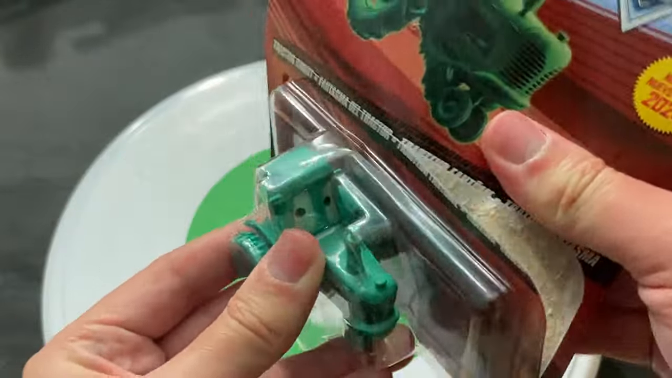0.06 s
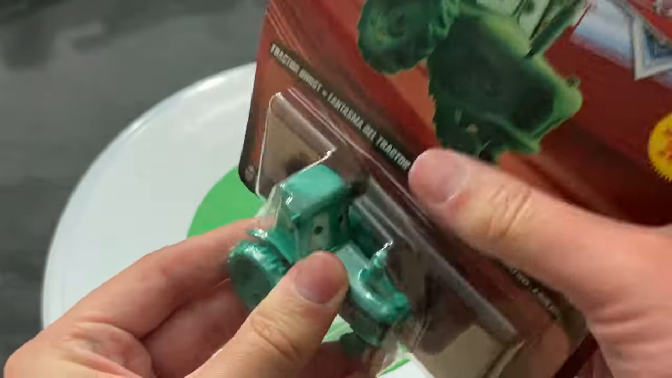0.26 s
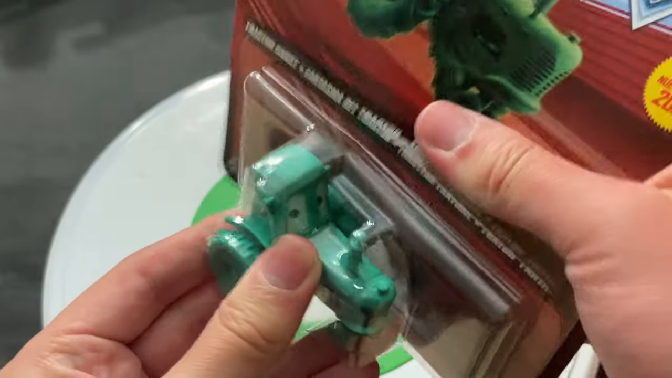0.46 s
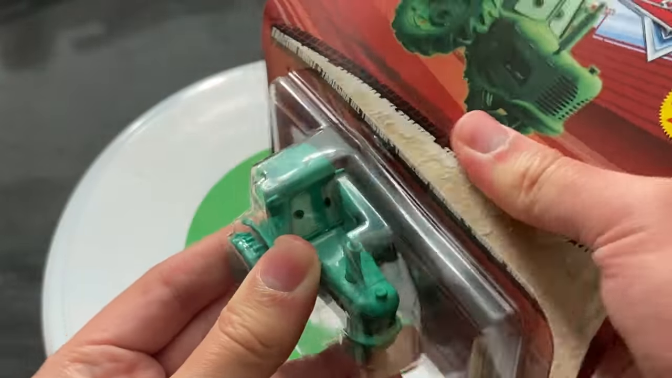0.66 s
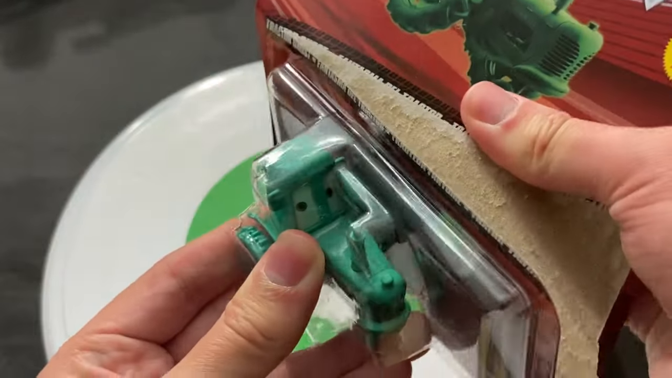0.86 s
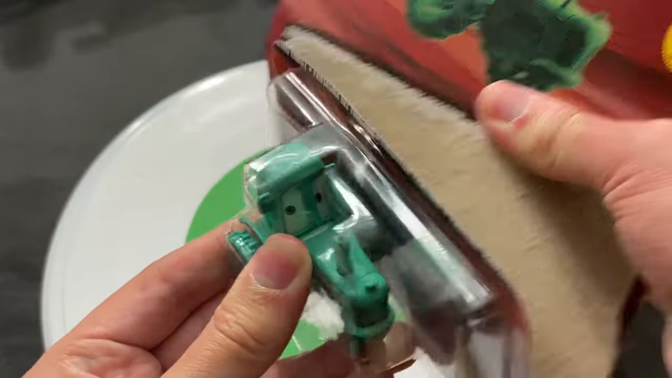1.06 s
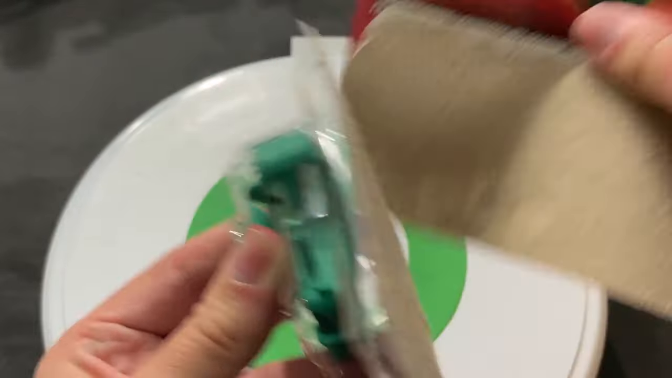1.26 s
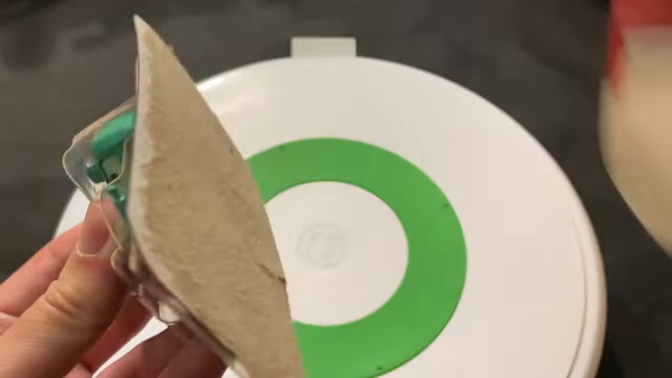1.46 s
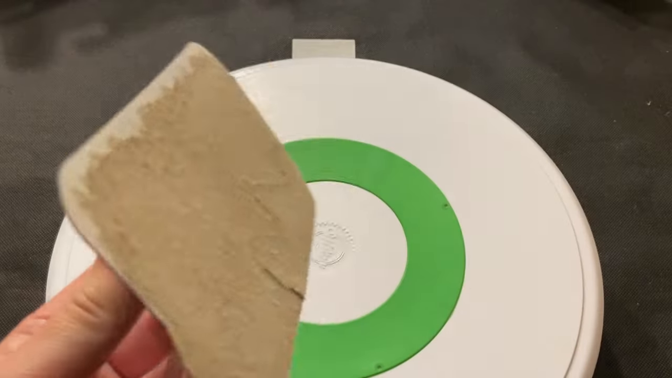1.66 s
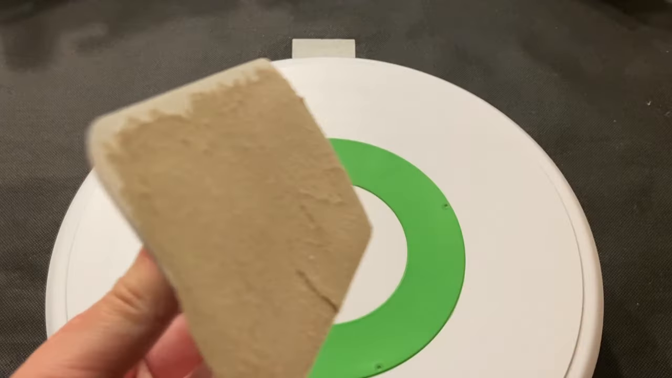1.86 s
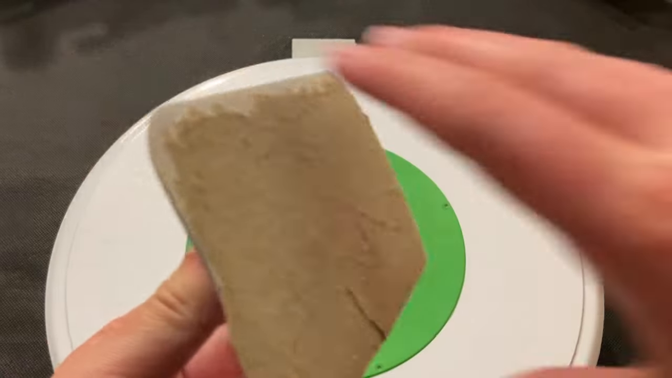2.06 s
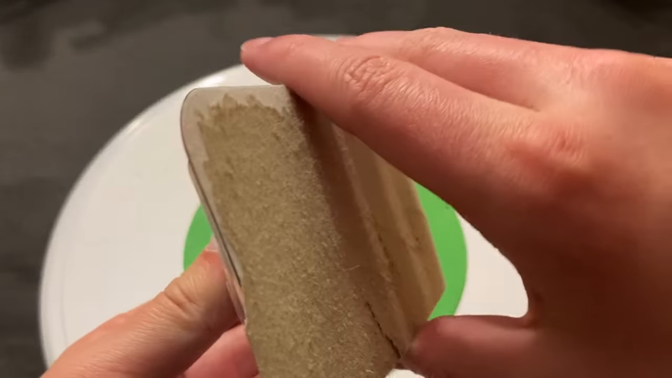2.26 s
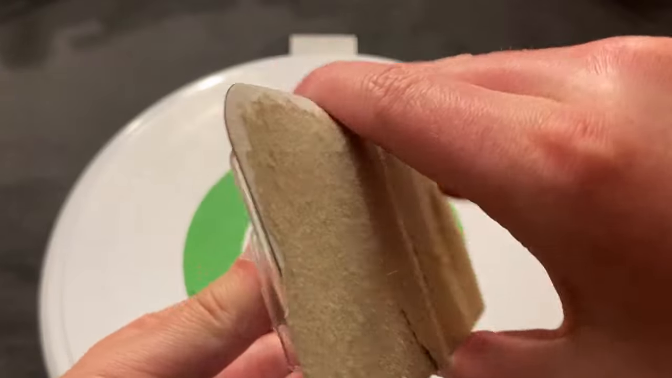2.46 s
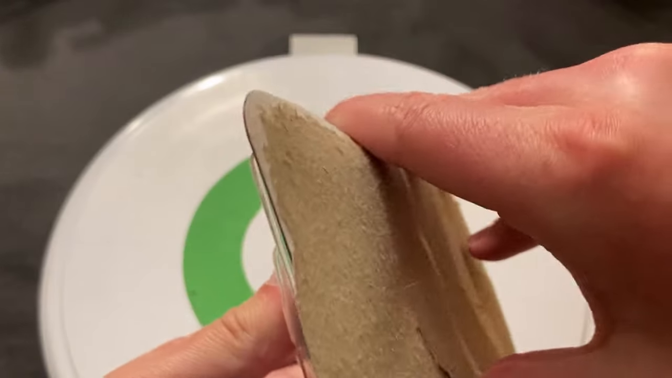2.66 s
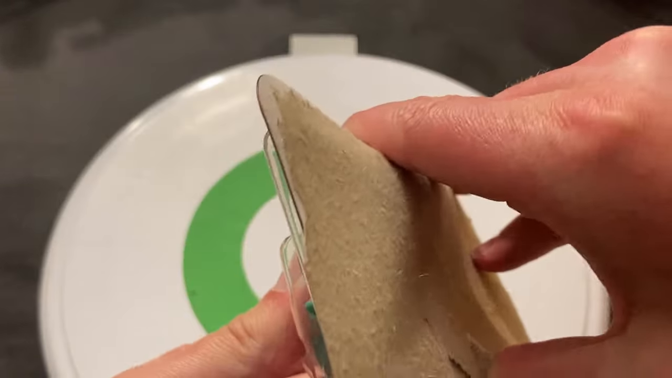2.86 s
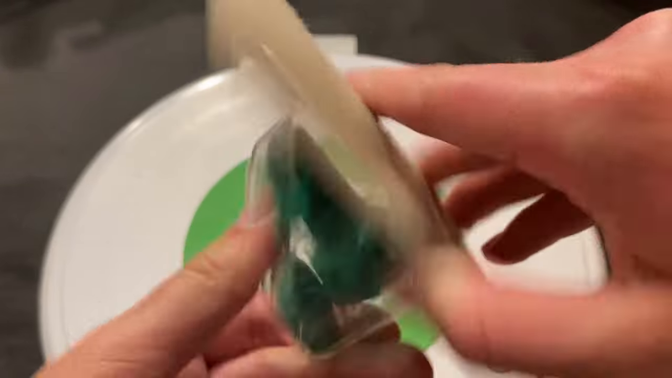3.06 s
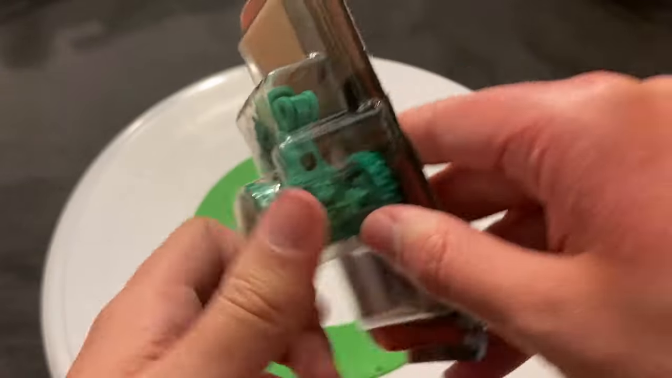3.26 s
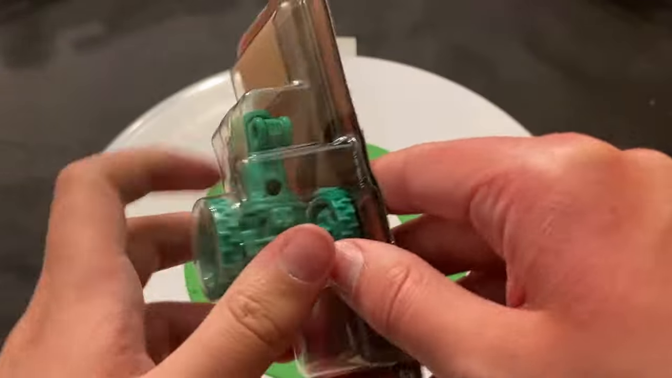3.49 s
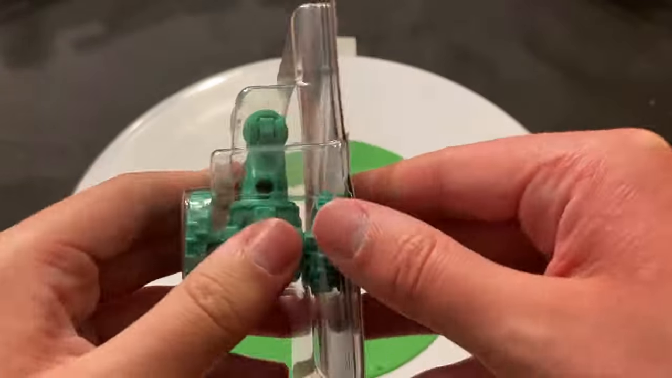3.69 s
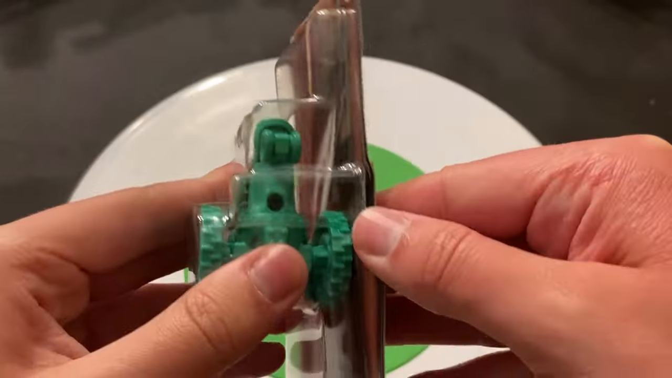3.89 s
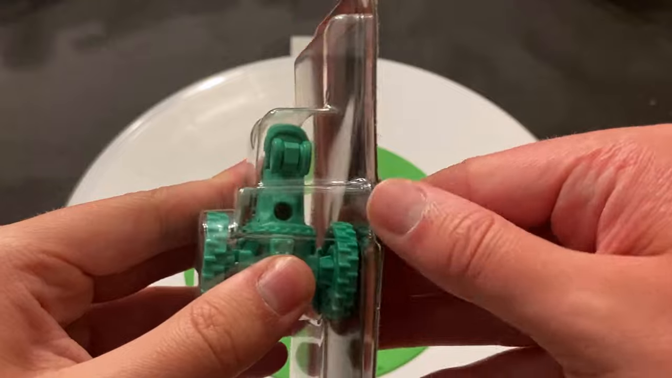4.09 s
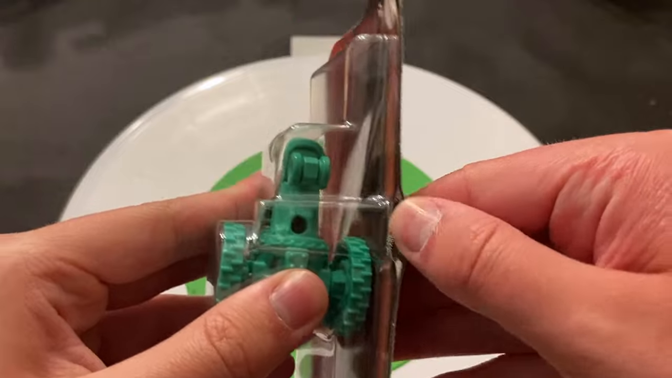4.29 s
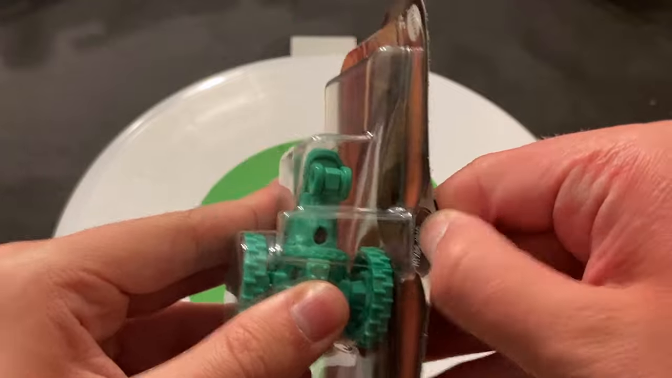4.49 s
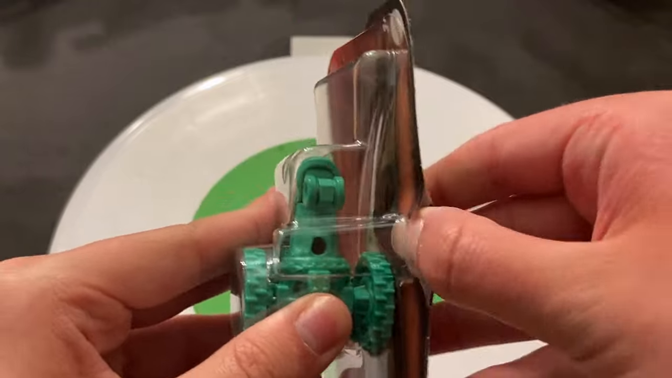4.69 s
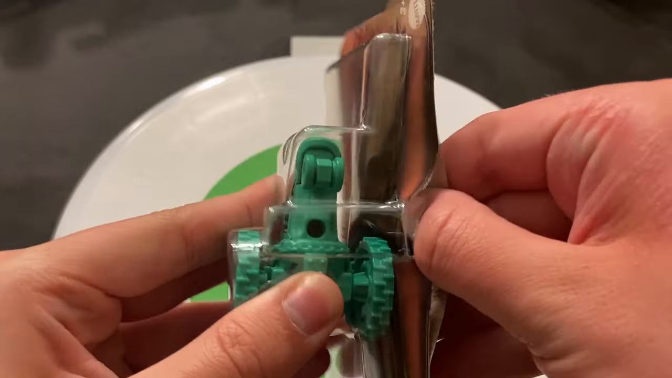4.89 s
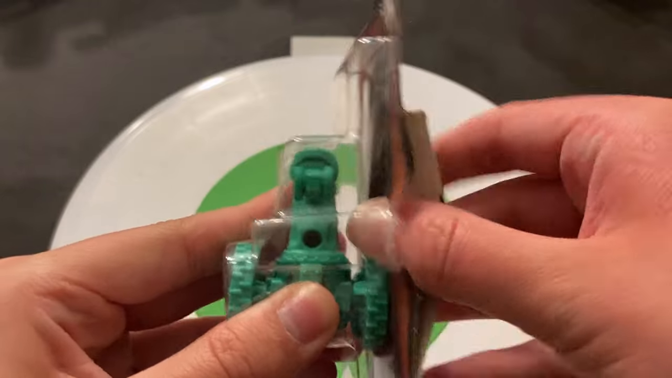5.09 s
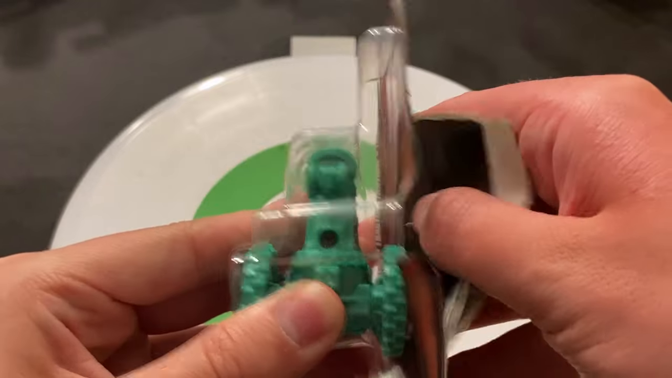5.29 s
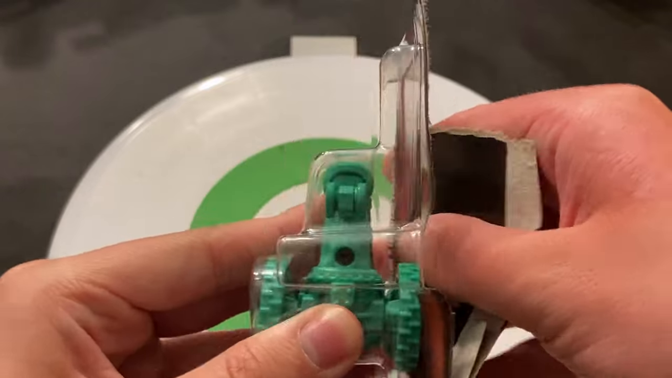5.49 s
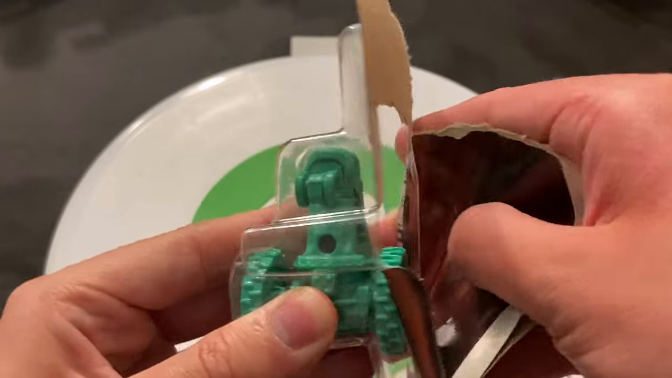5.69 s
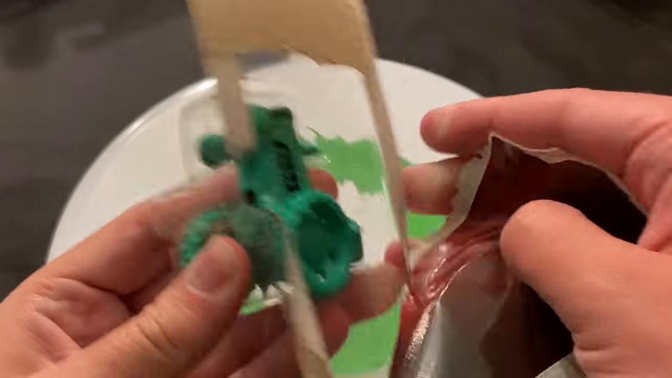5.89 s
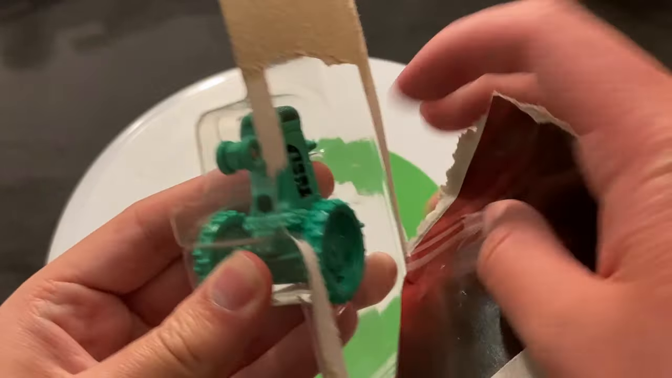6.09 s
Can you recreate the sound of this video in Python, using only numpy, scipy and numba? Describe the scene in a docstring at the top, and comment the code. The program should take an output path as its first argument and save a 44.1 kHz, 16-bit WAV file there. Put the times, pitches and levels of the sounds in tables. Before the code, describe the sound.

Close handling of a blister-packed toy: card fibres tear in jerky bursts, plastic snaps, loose card drops, quiet crinkles, then a final run of tears.

```python
"""Hands tear a cardboard backing off a plastic blister close to a phone in a small quiet room.
Over faint room tone, breaking paper fibres hiss from the start and drive the boxy ring of the pack.
Glue and plastic let go in ringing cracks, and jolts send falling bending waves along the card.
Near 1.9 s the loose card is dropped and bounces; lighter handling follows, then from about 4.9 s
a last run of hard cracks and tears."""
import sys
import numpy as np
from scipy import signal
from scipy.fft import rfft, irfft, next_fast_len
from scipy.io import wavfile
from scipy.ndimage import uniform_filter1d
from numba import njit

SR = 44100
rng = np.random.default_rng(int(sys.argv[2]) if len(sys.argv) > 2 else 0)


def gain_from_decibels(decibels):
    """Convert decibel values to linear amplitude factors."""
    exponent = np.asarray(decibels, float) / 20
    return 10 ** exponent


def digitize_waveform(pressure):
    """Quantize a signal to 16-bit integers and store it at the path in sys.argv[1].

    Rows of a 2-D input are taken as channels; values are limited to [-1, 1].
    """
    field = np.atleast_2d(pressure).T
    bounded = np.clip(field, -1, 1)
    quanta = np.round(bounded * 32767).astype(np.int16)
    wavfile.write(sys.argv[1], SR, quanta)


N = 271065
CARD_OFF_S = 2.05  # until then flaps and jolts run through the large piece of card


def unit(x):
    """Scale to rms 1."""
    return x / np.sqrt(np.mean(x ** 2))


def colour(x, points):
    """Filter by a causal minimum-phase response through (Hz, dB) points."""
    hz, db = np.transpose(points)
    size = 2048
    bins_hz = np.fft.rfftfreq(size, 1 / SR) + 1
    log_gain = np.log(gain_from_decibels(np.interp(np.log(bins_hz), np.log(hz), db)))
    # folding the cepstrum onto positive time makes the response causal
    cepstrum = irfft(log_gain)
    cepstrum[1:size // 2] *= 2
    cepstrum[size // 2 + 1:] = 0
    response = irfft(np.exp(rfft(cepstrum)))
    return signal.fftconvolve(x, response)[:len(x)]


def resonate(x, hz, width_hz, db):
    """A steep resonance: the same band-pass twice over."""
    b, a = signal.iirpeak(hz, hz / width_hz, fs=SR)
    return gain_from_decibels(db) * signal.lfilter(b, a, signal.lfilter(b, a, x))


@njit
def svf(x, hz, share):
    """State-variable band-pass whose centre moves; width is a share of the centre."""
    y, band, low = np.empty(len(x)), 0., 0.
    for i in range(len(x)):
        g = np.tan(np.pi * hz[i] / SR)
        v = (band + g * (x[i] - low)) / (1 + g * (g + share))
        band, low, y[i] = 2 * v - band, low + 2 * g * v, share * v
    return y


def walk(rate):
    """Random levels held 1 / rate s and slewed; spread near 1."""
    hold = int(SR / rate)
    levels = np.repeat(rng.standard_normal(N // hold + 1), hold)
    return uniform_filter1d(levels, hold // 2)[:N]


def breaks(rate, spread_db):
    """Fibres snapping at random moments, rate per second, most small, a few large."""
    chance, size = rng.random(N), rng.exponential(size=N)
    return unit((chance < rate / SR) * rng.standard_normal(N) * gain_from_decibels(spread_db * size))


# Colour of the snaps, with a steep top cut from 15.6 kHz that is no trait of the fibre.
# Each row: frequency in Hz, spectrum level in dB per Hz.
SNAP_COLOUR = [(880, -7.5), (1700, -0.5), (3000, 1.5), (7500, -2), (12000, -8.5), (15600, -15),
               (15900, -49)]


def snap_colour(x):
    """Give bare snaps their hissing colour, band-limited at the top."""
    return colour(x, SNAP_COLOUR)


# Colour of steady air and hiss, with a steep top cut from 15.6 kHz that is no trait of the room.
# Each row: frequency in Hz, relative spectrum level in dB per Hz.
AIR_COLOUR = [(18, -33), (30, -10), (124, -4.5), (239, -13.5), (473, -11), (10500, -30.5), (15600, -31),
              (16000, -55.5)]


def room_tone():
    """Faint steady air and microphone hiss: coloured, band-limited noise, slightly wandering in level."""
    level_db = -67 + 0.76 * walk(5.3)
    return unit(colour(rng.standard_normal(N), AIR_COLOUR)) * gain_from_decibels(level_db)


# Pulls and rubs of the hands. Each row: peak time in seconds, fibre hiss in dB, pack ring in dB,
# swell in ms, fade in ms; for the hiss, swell and fade each span 20 dB.
HAND_PULLS = [(0.05, -32.5, -47, 910, 78), (0.256, -49, -53, 370, 190), (0.256, -33.5, -33.5, 11, 39),
              (0.536, -32, -49, 44, 67), (0.7, -30, -36, 95, 138), (0.901, -45, -53.5, 990, 740),
              (1.095, -30, -35, 41, 120), (1.147, -23, -26, 128, 111), (1.32, -37.5, -35, 21, 108),
              (1.355, -26.5, -30, 120, 16), (1.515, -53, -61.5, 62, 170), (1.782, -45, -50.5, 86, 43),
              (1.905, -45, -32, 10.3, 200), (2.112, -53.5, -54.5, 12, 78), (2.225, -44.5, -46, 52, 56),
              (2.301, -54.5, -52.5, 41, 24), (2.34, -48.5, -53, 11, 27), (2.375, -59, -56, 37, 83),
              (2.456, -50, -56.5, 38, 195), (2.809, -54, -61, 61, 122), (3.005, -43, -54.5, 14, 560),
              (3.165, -32.5, -35, 95, 101), (3.348, -52, -58, 46, 31), (3.516, -55.5, -60, 170, 220),
              (3.647, -44.5, -42, 48, 85), (3.828, -59, -70.5, 38, 38), (3.979, -54, -59.5, 96, 63),
              (4.085, -54.5, -57, 17, 69), (4.34, -50.5, -60, 62, 190), (4.51, -44, -60, 153, 74),
              (4.609, -47.5, -53.5, 91, 84), (4.705, -44.5, -50, 21, 35), (4.787, -45.5, -54, 68, 153),
              (4.937, -28, -30.5, 27.3, 77), (5.088, -30.5, -39, 17, 28), (5.161, -32, -30.5, 71, 65),
              (5.359, -28, -29.5, 51, 59), (5.467, -50, -31, 25, 20), (5.51, -47, -50.5, 140, 38),
              (5.632, -26.5, -27, 29, 61), (5.69, -47, -44, 84, 150), (5.84, -41, -52, 300, 150),
              (5.928, -23, -27.5, 43, 75.6), (6.057, -40, -48.5, 71, 156)]


def effort():
    """Every pull swells to a rounded peak and fades; overlaps add in power. Hiss and ring dB per sample."""
    step = 32  # samples between computed levels
    ring_share = 0.84  # the ring swells and fades somewhat faster than the hiss
    t = np.arange(0, N + step, step) / SR
    s, hiss_db, ring_db, swell_ms, fade_ms = np.transpose(HAND_PULLS)[:, :, None]
    side_ms = np.clip(np.where(t < s, swell_ms, fade_ms), 2, None)
    spans = (t - s) * 1000 / side_ms * np.arccosh(10)  # 1 / cosh is 20 dB down at the end of a side
    curves = []
    for db, share in ((hiss_db, 1), (ring_db, ring_share)):
        pulls = gain_from_decibels(db) / np.cosh(np.clip(spans / share, -50, 50))
        level_db = 10 * np.log10(np.sum(pulls ** 2, axis=0))
        curves.append(np.interp(np.arange(N) / SR, t, level_db))
    return curves


# How the pack is held. Each row: time in seconds, treble lean in dB per octave, resting pack pitch in Hz.
HOLD = [(0.06, 3.5, 960), (0.55, -1, 985), (0.78, 3.5, 1122), (1.23, 2, 1042), (1.78, -0.5, 925),
        (1.98, -3.5, 536), (2.3, 3.5, 697), (2.48, -4, 1755), (2.75, 6.5, 823), (3.21, -2, 916),
        (3.58, 2, 1056), (4.03, -1.1, 1067), (4.4, 6.5, 1184), (4.72, 0, 1290), (5.05, 1.7, 850),
        (5.4, -1.7, 1043), (5.72, 2.5, 1030), (6.0, 2, 1265)]


def grip():
    """The changing hold sets treble lean and pack pitch, one value per sample."""
    s, *columns = np.transpose(HOLD)
    return [np.interp(np.arange(N) / SR, s, c) for c in columns]


# Pack resonances under tearing. Each row: ratio to pack pitch, width as a share of the centre
# for each of two passes, relative level in dB.
PACK_MODES = [(.7, 0.53, 0.5), (1.0, 0.6, 13), (1.35, .4, -2.5)]
# Slack card moving air, deep flap then broad one. Each row: centre in Hz, width in Hz for each of
# two passes, relative level in dB before the balance for the size of card.
CARD_FLAPS = [(82, 36, -10.5), (264, 770, 19)]


def tearing():
    """The rip advances in jerks; the same breaks make hiss, shake the pack and stir the slack card."""
    jerk_db = 2.5  # unevenness of the rip
    hiss_db, ring_db = effort()
    lean_db, pack_hz = grip()
    pack_hz = pack_hz * (1 + 0.09 * walk(30))  # the flexing shell never keeps its shape
    snaps = breaks(12000, 1.7) * gain_from_decibels(jerk_db * walk(90) + 0.28 * walk(390))
    # bright handling is mostly plastic, which adds lone ticks
    ticks = breaks(400, 1.2) * gain_from_decibels(-16.0 + 0.76 * lean_db)
    hiss = unit(snap_colour(snaps + ticks)) * gain_from_decibels(hiss_db)
    ring = 0
    for k, (ratio, width, db) in enumerate(PACK_MODES):
        mode_hz = ratio * pack_hz
        mode = svf(svf(snaps, mode_hz, 1. * width), mode_hz, 1. * width)
        ring = ring + (-1) ** k * gain_from_decibels(db) * mode  # neighbours in opposite sign
    ring = unit(ring) * gain_from_decibels(ring_db + jerk_db * walk(60))
    whole = np.arange(N) < CARD_OFF_S * SR
    deep, broad = [resonate(snaps, *row) for row in CARD_FLAPS]
    flap = unit(deep * gain_from_decibels(np.where(whole, 7, -14)) + broad)  # only the large card flaps deep
    gusts_db = 3 * walk(25)
    return hiss, ring + flap * gain_from_decibels(ring_db - 15.0 + gusts_db)


# Cracks and knocks. Each row: peak time in seconds, crack level in dB, ring level in dB,
# ring pitch in Hz, length in ms (held between 0.3 and 40).
RELEASES = [(0.04, -35, -33.5, 900, 3.6), (0.082, -36, -42, 900, 1.7), (0.104, -33, -45, 700, 3.6),
            (0.255, -30, -26.5, 1200, 16.5), (0.266, -29.5, -29.5, 710, 6),
            (0.5293, -12.5, -8.5, 1435, 4.2), (0.5335, -31.5, -7, 600, 3), (0.7001, -20, -21, 1260, 3.4),
            (1.197, -26, -19, 895, 1.2), (1.3557, -30, -25, 1346, 6.2), (1.362, -20, -15, 1019, 5.3),
            (1.8999, -12, -5, 440, 3), (1.961, -60, -21, 516, 2), (1.993, -69, -31, 490, 1.4),
            (2.1046, -35.5, -42.5, 415, 3.9), (2.2165, -32, -35, 431, 1.2), (2.364, -40.5, -36.5, 806, 4.8),
            (2.3757, -38, -43, 760, 5.7), (2.4469, -27.5, -29, 1780, 4.5), (2.4714, -31.5, -44, 1650, 3.05),
            (3.142, -17.5, -24, 1080, 3), (3.1617, -32, -20, 1076, 8.4), (3.196, -30, -16, 780, 3),
            (3.283, -43.5, -39.5, 1120, 6), (3.3754, -39, -53, 1190, 2.6), (3.4834, -45, -35, 1090, 6.8),
            (3.5221, -48, -35, 1060, 8.3), (3.633, -38, -29.5, 1150, 50), (3.946, -63, -48, 1000, 3.1),
            (4.0575, -66, -43, 980, 0.74), (4.291, -48, -57, 1000, 2.3), (4.33, -38, -52.5, 910, 3.3),
            (4.3655, -37.5, -71, 940.0, 3.6), (4.462, -30.5, -42.5, 1030, 3.9),
            (4.5215, -29.5, -62, 1530.0, 1.2), (4.7724, -41, -58, 1632, 1.1),
            (4.8855, -39.5, -37, 1650, 21), (4.9255, -7.5, -21.5, 855, 1.9),
            (4.9373, -23.5, -7.5, 912, 1.8), (5.0787, -32, -34, 1330, 2), (5.0891, -17.5, -24.5, 1496, 2.9),
            (5.094, -39, -20.5, 916, 6.5), (5.121, -21, -21, 421, 4.3), (5.149, -45, -29, 343, 38),
            (5.1375, -36, -20, 1350, 0.85), (5.175, -27, -24, 1030, 3.6),
            (5.3076, -28.5, -53.5, 1610.0, 3.8), (5.346, -14.5, -11.5, 984, 14.4),
            (5.36, -24, -14, 680, 3.5), (5.3702, -22, -22.5, 880, 11), (5.467, -27, -25, 1060, 3.8),
            (5.6113, -33, -45, 850, 3), (5.625, -19.5, -21.5, 1040, 6.2), (5.635, -9, -19, 1050, 1.9),
            (5.692, -25.5, -27, 746, 8.8), (5.7182, -27.5, -26.5, 1864, 4.3), (5.744, -27, -34, 1188, 1.5),
            (5.806, -32, -45, 1300, 2), (5.8246, -18, -19.5, 1323, 5.8), (5.9066, -8.5, -8.5, 1213, 3.3)]
# Modes of a struck pack. Each row: ratio to ring pitch, cycles to fade 60 dB, relative level in dB.
RING_MODES = [(.62, 6, -4), (1.0, 14, 0), (1.6, 13, -7), (2.301, 18.5, -18.5)]


def cracks():
    """Each release is a volley of snaps that swells to its peak, dies away and rings the pack."""
    lead = SR // 50
    t = np.arange(-lead, 4 * lead) / SR
    after = t[lead:]
    # high bending waves arrive first: the ring sags
    hurried = after + 0.00022 * (1 - np.exp(-after / .003))
    bright, body = np.zeros((2, N + 2 * len(t)))
    snaps = breaks(16000, 2.2)
    signs = rng.choice([-1, 1], (len(RELEASES), len(RING_MODES)))
    for (s, crack_db, ring_db, hz, ms), sign in zip(RELEASES, signs):
        at = int(s * SR) - lead
        length = np.clip(ms, .3, 40) / 1000
        rise = .08 if ring_db > crack_db + 3 else .17  # a knock starts at once, a peel swells
        shape = 1 / np.cosh(np.where(t < 0, t / (rise * length), t / (0.4 * length)))
        volley = np.resize(snaps[at:], len(t)) * shape
        volley *= np.linalg.norm(shape) / np.linalg.norm(volley)
        bright[at:at + len(t)] += gain_from_decibels(crack_db) * volley
        # the main release outweighs the rest
        push = volley + (t == 0) * .8 * np.linalg.norm(volley)
        modes = 0
        for (ratio, cycles, db), g in zip(RING_MODES, sign):
            fade = 1000 ** (-after * hz * ratio / cycles)
            modes = modes + g * gain_from_decibels(db) * np.sin(2 * np.pi * hz * ratio * hurried) * fade
        onset = 1 - np.exp(-after * hz * 8.8)
        # the gradient thins the bass: a small panel radiates little of it
        ring = signal.fftconvolve(push, np.gradient(modes * onset))
        body[at:at + len(ring)] += np.sqrt(2) * gain_from_decibels(ring_db) * ring / np.abs(ring).max()
    snap = snap_colour(bright)[:N] / np.std(snap_colour(snaps))
    return snap, body[:N]


# Jolts of the card. Each row: start in seconds, level in dB before onset, fade and bass cut.
JOLTS = [(0.259, -27.5), (0.531, -25), (0.702, -31), (1.197, -33.5), (1.361, -21), (1.592, -41),
         (1.895, -38.5), (2.211, -39), (2.453, -37), (3.194, -39), (5.347, -22.5), (5.465, -37.5),
         (4.937, -33), (5.636, -37.5), (5.907, -32)]


def thumps():
    """Low bending waves travel slowest, so a jolt is a falling sweep; the whole card sinks deepest."""
    start_hz, whole_hz, scrap_hz = 380, 65, 160
    onset_s, glide_s, fade_s = 0.0028, 0.011, 0.012
    t = np.arange(SR // 8) / SR
    envelope = (1 - np.exp(-t / onset_s)) ** 2 * np.exp(-t / fade_s)
    out = np.zeros(N + len(t))
    for (s, db), phase in zip(JOLTS, rng.random(len(JOLTS))):
        end_hz = whole_hz if s < CARD_OFF_S else scrap_hz
        hz = end_hz + (start_hz - end_hz) * np.exp(-t / glide_s)
        sweep = np.sin(2 * np.pi * (np.cumsum(hz) / SR + phase))
        jolt = gain_from_decibels(db) * sweep * envelope
        at = int(s * SR)
        out[at:at + len(t)] += signal.lfilter(*signal.butter(2, end_hz / 2, "high", fs=SR), jolt)
    return out[:N]


def shade(x, lean_db, patchy_db, centre_hz=5500):
    """Tilt the treble and let each third octave wander, as the torn edge turns and changes length."""
    size = next_fast_len(N)
    spectrum = rfft(x, size)
    third = np.clip(3 * np.log2((np.fft.rfftfreq(size, 1 / SR) + 1) / centre_hz), -5, 5)
    out = 0
    for step in range(-5, 6):  # third octaves from the centre; the end bands take in all beyond
        band = irfft(spectrum * np.clip(1 - abs(third - step), 0, 1), size)[:N]
        out = out + band * gain_from_decibels(lean_db * step / 3 + patchy_db * walk(17))
    return out


def short_echo(near):
    """Diffuse return from table and walls: decaying noise as the impulse response."""
    t60_s, level_db = 0.25, -19
    t = np.arange(int(.3 * SR)) / SR
    echo = rng.standard_normal(len(t)) * 1000 ** (-t / t60_s) * np.clip(t / 0.0039, 0, 1)
    echo = signal.lfilter([1], [1, -.35], echo)  # soft surfaces dull the return
    return gain_from_decibels(level_db) * signal.fftconvolve(near, echo / np.sqrt(np.sum(echo ** 2)))[:N]


def scene():
    """Near sources, a short diffuse echo from table and walls, room tone."""
    air = room_tone()
    hiss, ring = tearing()
    snap, knock = cracks()
    lean_db, _ = grip()
    near = shade(hiss + snap, lean_db, patchy_db=2.5) + ring + thumps()
    # a crack is too small to move much air
    near += signal.lfilter(*signal.butter(2, 170, "high", fs=SR), knock)
    return (near + short_echo(near) + air)[None]


def top_cut(x):
    """Nothing passes above the cut-off."""
    return signal.sosfilt(signal.butter(12, 16550, fs=SR, output="sos"), x)


def record(dry):
    """The phone rounds the loudest peaks and cuts the deep bass."""
    ceiling = .66
    rounded = ceiling * np.tanh(dry / ceiling)
    bass_cut = signal.butter(4, 55, "high", fs=SR, output="sos")
    mix = signal.sosfilt(bass_cut, rounded)
    return top_cut(mix)


dry = scene()
out = record(dry)
digitize_waveform(out)
```